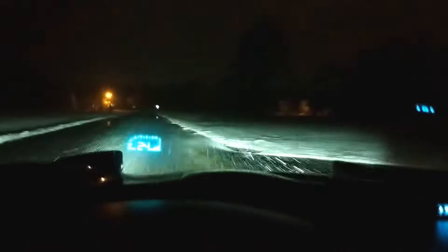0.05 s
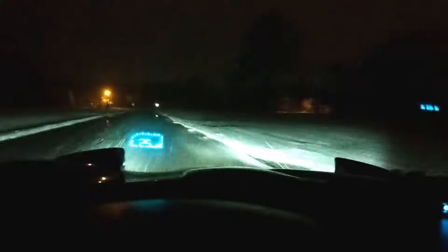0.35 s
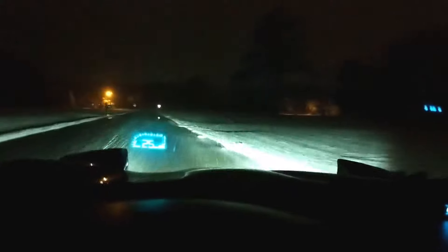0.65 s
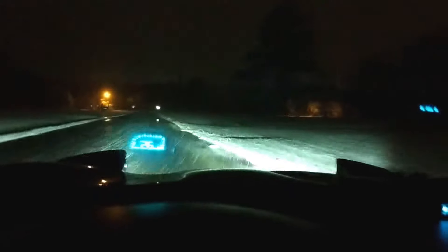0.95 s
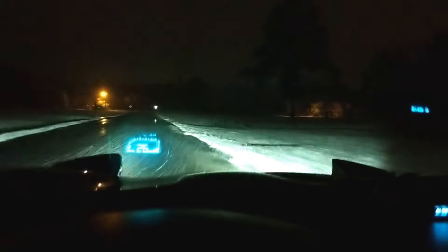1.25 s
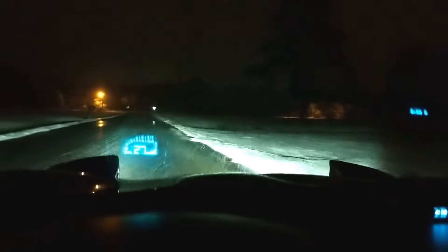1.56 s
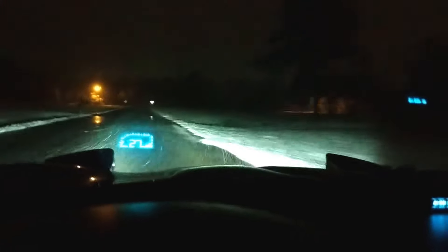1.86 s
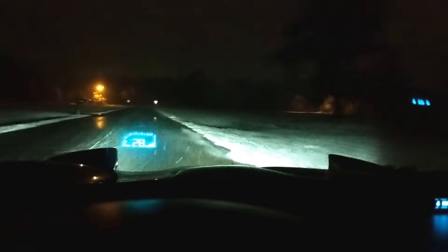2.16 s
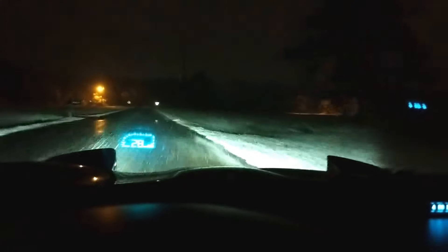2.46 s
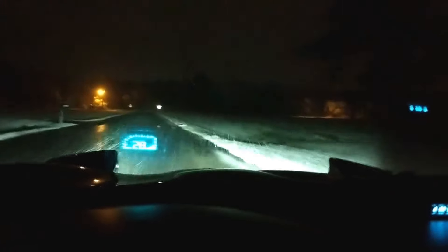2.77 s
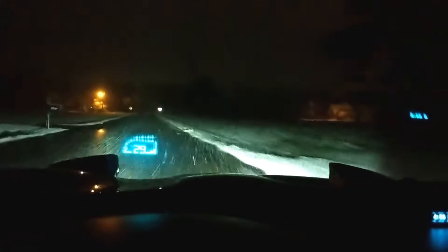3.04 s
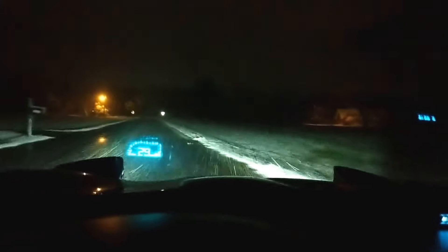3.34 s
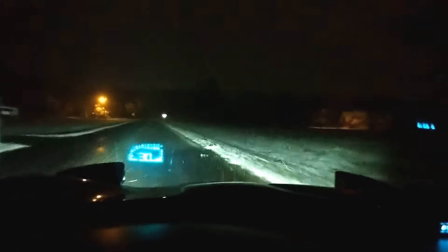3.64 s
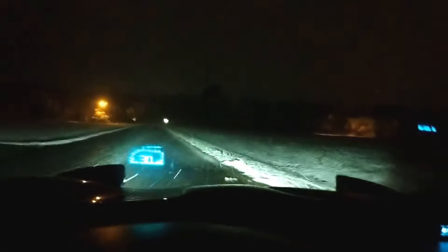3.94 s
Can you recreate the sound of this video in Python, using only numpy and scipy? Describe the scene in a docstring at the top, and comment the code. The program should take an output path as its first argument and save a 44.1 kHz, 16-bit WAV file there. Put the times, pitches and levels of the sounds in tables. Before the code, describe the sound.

Inside a moving car, a low engine drone climbs slowly, then settles lower after an upshift. Tyres rumble and swish softly through water, while keys jingle faintly and loose plastic clacks a few times, mostly near the end.

```python
"""Night drive on a wet road

Inside a car gathering speed, the engine's firing tone booms in the cabin, climbs slowly and drops
at an upshift. The road rumbles through the body, and the tyres hiss and swish through the water.
Something small and metal, probably keys, swings and jingles; plastic trim knocks now and then."""
import sys
import numpy as np
from scipy import signal
from scipy.fft import rfft, irfft
from scipy.io import wavfile
from scipy.ndimage import map_coordinates

SR = 44100
rng = np.random.default_rng(int(sys.argv[2]) if len(sys.argv) > 2 else 0)


def bounce(signal):
    """Save signal as a 16-bit WAV file at the path given by the first command-line argument."""
    frames = np.transpose(np.atleast_2d(signal))
    limited = np.clip(frames, -1, 1)
    pcm = np.round(limited * 32767).astype(np.int16)
    wavfile.write(sys.argv[1], SR, pcm)


N = 176400
TIME = np.arange(N) / SR


def undb(db):
    """Decibels to gain."""
    return 10 ** (np.asarray(db) / 20)


def unit(x):
    """Scale to rms 1."""
    return x / np.sqrt(np.mean(x ** 2) + 1e-18)


def curve(rows, column=1):
    """An automation lane: one column of a table, joined by straight lines in time."""
    rows = np.array(rows)
    return np.interp(TIME, rows[:, 0], rows[:, column])


def drift(per_s):
    """Smooth random modulation at rms 1, changing about per_s times a second."""
    steps = rng.standard_normal(1024)
    return unit(map_coordinates(steps, [TIME * per_s], order=2, mode="mirror"))


def colour(x, eq):
    """Shape a sound with an EQ curve that rolls off past its ends, at rms 1."""
    hz, db = np.array(eq).T
    log_hz = np.log(np.arange(len(x) // 2 + 1) * SR / len(x) + 1e-3)
    beyond = np.maximum(np.log(hz[0]) - log_hz, 0) + np.maximum(log_hz - np.log(hz[-1]), 0)
    gain = undb(np.interp(log_hz, np.log(hz), db) - 20 * beyond)
    return unit(irfft(rfft(x) * gain, len(x)))


def resonant_noise(hz, width_hz):
    """Noise sent twice through a resonance for steep skirts, at rms 1."""
    b, a = signal.iirpeak(hz, hz / width_hz, fs=SR)
    once = signal.lfilter(b, a, rng.standard_normal(N))
    return unit(signal.lfilter(b, a, once))


def impacts(per_s, spread_db):
    """Randomly timed tiny impacts of uneven size, at rms 1."""
    hits = rng.random(N) < per_s / SR
    size = np.minimum(rng.exponential(size=N), 4)
    sign = rng.choice([-1, 1], N)
    return unit(hits * sign * undb(spread_db * size))


def strike(modes, burst_eq, burst_db, burst_t60_s, contact_hz, ring_db=0, ring_stretch=1):
    """One blow on an object: ringing modes and a noise burst, dulled by the softness of the contact."""
    t = np.arange(SR // 4) / SR
    ring = 0
    for hz, db, t60 in modes:
        fade = 1000 ** (-t / (t60 * ring_stretch))
        ring += undb(db) * unit(fade * np.sin(2 * np.pi * (hz * t + rng.random())))
    burst = colour(rng.standard_normal(len(t)), burst_eq) * 1000 ** (-t / burst_t60_s)
    blow = (undb(ring_db) * unit(ring) + undb(burst_db) * unit(burst)) / np.sqrt(len(t))
    softness = signal.cheby1(6, 1, contact_hz, fs=SR, output="sos")
    return signal.sosfilt(softness, blow)


def blows(cues, **material):
    """Separate strikes on one object, each with its own level and ring length."""
    out = np.zeros(N + SR)
    blow_gain = np.sqrt(0.0068 * SR)  # the energy of 6.8 ms at rms 1
    for at, db, ring_stretch in cues:
        blow = strike(ring_stretch=ring_stretch, **material)
        start = int(at * SR)
        out[start:start + len(blow)] += undb(db) * blow_gain * blow
    return out[:N]


# EQ of the body rumble (frequency [Hz], gain [dB])
RUMBLE_EQ = [(20, -26), (30, -22), (42, -8), (65, 2), (100, -2.5), (140, -0.5), (200, -5.5), (250, -16),
             (400, -23)]
# fader ride of the rumble (time [s], level [dB])
RUMBLE_FADER = [(0, -30), (.6, -34), (1.7, -30), (2.1, -33.5), (2.5, -33), (4, -33)]
# cabin air resonances (frequency [Hz], width [Hz], relative level [dB])
CABIN_MODES = [(46.6, 14, -47), (57.7, 14, -39), (78.1, 22, -34), (145.9, 9.1, -39.5), (169.9, 10.9, -35),
               (288, 27, -50)]
# fader ride of the cabin boom (time [s], gain [dB])
BOOM_FADER = [(0, 3), (.4, 1), (.65, -2), (1.15, -0.5), (1.7, -9), (2.25, -7.5), (2.45, 6), (2.8, -4.5),
              (3.35, 3.5), (3.8, -1), (4, 1.5)]
# EQ of the road roar (frequency [Hz], gain [dB])
ROAR_EQ = [(130, -18), (230, 1), (300, 2.5), (450, 0), (620, -5.5), (850, -14.5), (1300, -25),
           (3000, -48.5)]
# fader ride of the roar (time [s], level [dB])
ROAR_FADER = [(0, -39.5), (.6, -38.5), (1.1, -37), (1.7, -37.5), (2.2, -39), (2.7, -42), (3.3, -38.5),
              (4, -39.5)]

def road():
    """The low bed: the road shakes the body, sets the cabin air booming and roars through the floor."""
    rumble = colour(rng.standard_normal(N), RUMBLE_EQ) * undb(curve(RUMBLE_FADER))
    boom = sum(undb(db) * resonant_noise(hz, width) for hz, width, db in CABIN_MODES)
    roar_db = curve(ROAR_FADER) + 1.27 * drift(per_s=13)
    roar = undb(roar_db) * colour(rng.standard_normal(N), ROAR_EQ)
    return rumble + boom * undb(curve(BOOM_FADER)) + roar


# EQ of the tyre hiss (frequency [Hz], gain [dB])
HISS_EQ = [(350, 0), (750, -2), (1050, -2), (1400, 0.5), (1750, -5), (2600, -6), (3700, -12), (5200, -16.5),
           (6800, -18), (8400, -20), (10000, -26), (12000, -33.5), (15500, -36)]
# fader ride of the hiss (time [s], relative level [dB])
HISS_FADER = [(0.0, -43), (0.34, -45), (0.62, -44.5), (1.27, -41.5), (1.68, -41.5), (2.54, -43.5),
              (3.6, -43)]

def tyres():
    """Hiss and fine spray from the wet road, with a faint gear whine tucked underneath."""
    water = rng.standard_normal(N) + undb(-15.5) * impacts(per_s=900, spread_db=2.5)
    hiss_db = curve(HISS_FADER) - 0.23 + 0.55 * drift(per_s=25.18)
    whine = undb(-62) * resonant_noise(hz=1950, width_hz=30)
    return colour(water, HISS_EQ) * undb(hiss_db) + whine


# EQ of the wet swish (frequency [Hz], gain [dB])
SWISH_EQ = [(400, -7.5), (650, -5.5), (1000, -0.5), (1500, 1), (2100, -4.5), (2800, -7.5), (4000, -15.5),
            (7000, -24.5)]

def wet_stretch():
    """A swish swells and fades as the tyres run through more water."""
    peak_s, width_s, peak_db = 1.62, 0.52, -45.5
    swell = np.exp(-.5 * ((TIME - peak_s) / width_s) ** 2)
    gain = swell * undb(peak_db + 0.55 * drift(per_s=25))
    return gain * colour(rng.standard_normal(N), SWISH_EQ)


# knock cues (time [s], relative level [dB], ring length [x mode t60])
KNOCK_CUES = [(1.975, -39, .4), (2.163, -36, 1.3), (2.174, -35, .5), (3.278, -44, .7), (3.606, -48, .6),
              (3.663, -37, .5), (3.672, -33.5, .7), (3.922, -32, .6), (3.929, -37, .5), (3.939, -37.5, 1.3),
              (3.968, -44, 1.8)]
# hollow ring of the plastic (frequency [Hz], relative level [dB], t60 [s])
TRIM_MODES = [(915, -4, 0.073), (1095, -6.5, .06), (1237, 2.5, 0.13), (1340, 0.5, .12), (1510, -7.5, .04),
              (1716, -4, .06), (2660, -16.5, 0.043), (3280, -9.5, 0.027), (4210, -16, 0.046)]
# EQ of the clack (frequency [Hz], gain [dB])
CLACK_EQ = [(400, -12), (1300, 9.5), (2200, -6), (3300, -1.5), (6000, -9), (10000, -44)]

def trim():
    """Loose plastic knocks and rebounds with a hollow ring."""
    return blows(KNOCK_CUES, modes=TRIM_MODES, contact_hz=5660,
                 burst_eq=CLACK_EQ, burst_db=-7, burst_t60_s=0.082)


# jingle cues (time [s], relative level [dB], attack [s], decay [s], ring gain [dB])
JINGLE_CUES = [(.127, -49, .008, .01, -11), (.312, -50.5, .01, .016, 1), (.496, -55, .006, .012, -2),
               (.689, -48, 0.018, .01, 3), (.859, -45.5, .006, 0.0074, -4), (1.06, -49, 0.026, 0.033, -9),
               (1.273, -53, .01, .015, -3), (1.437, -44, 0.012, .014, 1), (1.654, -53, .006, .01, -5),
               (1.814, -46.5, 0.012, 0.015, -2), (2.173, -35.5, 0.013, 0.016, -11),
               (2.357, -55, .008, .012, -2), (2.439, -51, .006, .01, -2), (2.534, -54, .01, .02, 2),
               (2.93, -49, .007, 0.013, -1), (3.303, -48.5, .008, 0.023, -4),
               (3.648, -45.5, .006, 0.012, 3), (3.675, -37.5, 0.0066, 0.023, 5),
               (3.725, -47.5, .01, 0.014, 4), (3.872, -65, .008, .012, 8)]
# hard clink cues (time [s], relative level [dB], ring length [x mode t60])
CLINK_CUES = [(3.670, -34, 1.1), (3.682, -46, 1), (3.921, -44.5, .7)]
# bright ring of the metal (frequency [Hz], relative level [dB], t60 [s])
METAL_MODES = [(3040, -10.5, .08), (4150, -11, .08), (5130, -11, .05), (5000, -7, 0.057),
               (6150, -12.5, 0.074), (6140, -12.5, .05), (6564, -0.5, .08), (6664, 1, .14),
               (7240, -10.5, .03), (7440, -11, 0.12), (7200, -11.5, .05), (7930, -5, .08),
               (8650, -25, 0.045), (9320, -19, .08)]
# EQ of the contact scrape (frequency [Hz], gain [dB])
SCRAPE_EQ = [(1500, -12), (3200, -1), (5000, -0.5), (6700, 2.5), (8300, -4.5), (9500, -14.5), (12000, -35)]

def keys():
    """Each swing is a flurry of tiny metal contacts that builds and dies; a few land as hard clinks."""
    metal = dict(modes=METAL_MODES, burst_eq=SCRAPE_EQ, burst_t60_s=0.013, contact_hz=9500)
    ring_db = -5
    contacts = impacts(per_s=1400, spread_db=1)
    out = blows(CLINK_CUES, ring_db=ring_db, burst_db=-16, **metal)
    for at, db, attack, decay, ring_gain_db in JINGLE_CUES:
        near = np.abs(TIME - at) < .5
        from_peak = TIME[near] - at
        swing = undb(db) * np.exp(-np.maximum(-from_peak / attack, from_peak / decay))
        tink = strike(ring_db=ring_db + ring_gain_db, burst_db=0.5, **metal)
        out[near] += signal.fftconvolve(swing * contacts[near], tink)[:len(swing)]
    return out


# pitch and fader ride of the firing tone (time [s], firing rate [Hz], relative level [dB])
FIRING_RIDE = [(0.08, 111.5, -20), (0.96, 115.7, -21), (1.65, 119.5, -21.5), (1.85, 113.1, -18),
               (2.1, 101.3, -18), (2.18, 100.5, -17), (2.29, 100.7, -18.5), (3.85, 102.2, -17.5),
               (3.92, 102.1, -18)]
# partials around the firing tone (order [cycles per crank turn])
ENGINE_ORDERS = [1, 2, 3, 5, 6, 8, 12, 17]
# mix of those partials, a row each (level before the upshift [dB], level after it [dB])
ORDER_MIX = [(-46, -61), (-45, -51), (-36, -42), (-37.5, -44), (-55.5, -41.5), (-58, -48), (-54, -62),
             (-52.5, -63)]

def engine():
    """A clean firing tone over weaker, wavering crank orders whose mix crossfades at the upshift."""
    firings_per_turn, shift_s, crossfade_s = 4, 1.72, 0.46
    firing_phase = 2 * np.pi * np.cumsum(curve(FIRING_RIDE)) / SR
    crank_phase = firing_phase / firings_per_turn
    firing_db = curve(FIRING_RIDE, column=2) - 1 + .5 * drift(per_s=9)
    out = undb(firing_db) * np.sin(firing_phase)
    crossfade = np.clip((TIME - shift_s) / crossfade_s + .5, 0, 1)
    for order, (before, after) in zip(ENGINE_ORDERS, ORDER_MIX):
        order_db = before + (after - before) * crossfade + 6 * drift(per_s=5.97)
        phase_wobble = 2 * np.pi * rng.random() + .5 * drift(per_s=7)
        out += undb(order_db) * np.sin(order * crank_phase + phase_wobble)
    return np.sqrt(2) * out  # makes the sine levels rms


def scene():
    """The mono mix, as heard from the front seat."""
    return (engine() + road() + tyres() + wet_stretch() + keys() + trim())[None]


def record(dry):
    """A steep high cut takes off the very top."""
    cutoff_hz = 15750
    return signal.sosfilt(signal.ellip(10, .1, 80, cutoff_hz, fs=SR, output="sos"), dry)


dry = scene()
out = record(dry)
bounce(out)
```